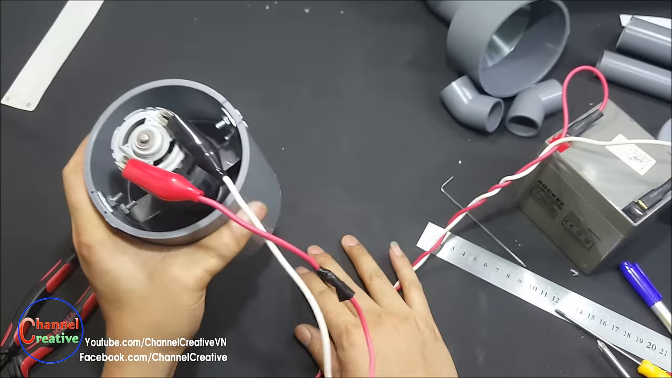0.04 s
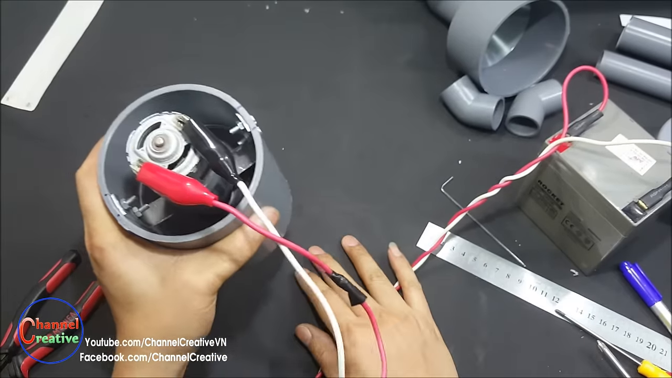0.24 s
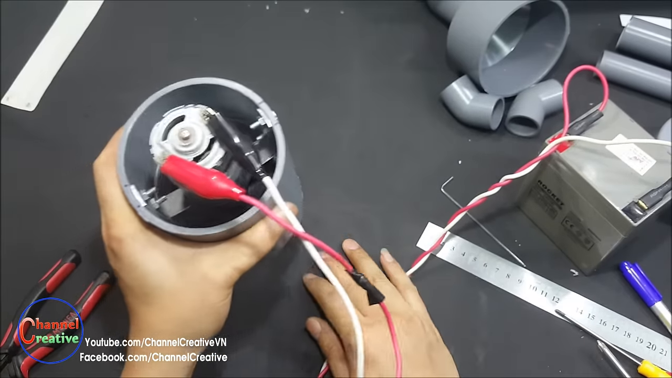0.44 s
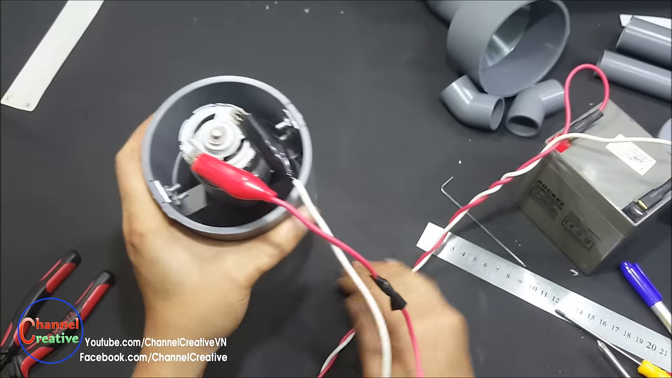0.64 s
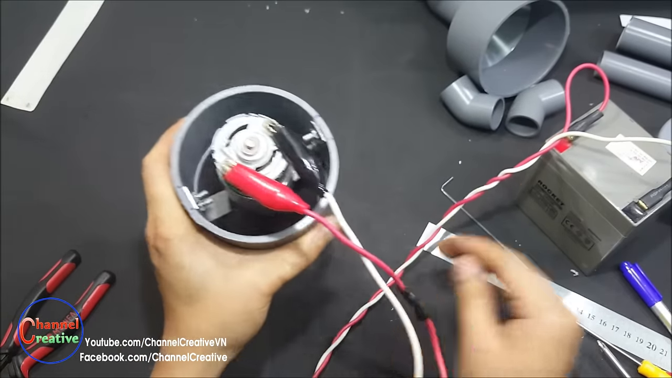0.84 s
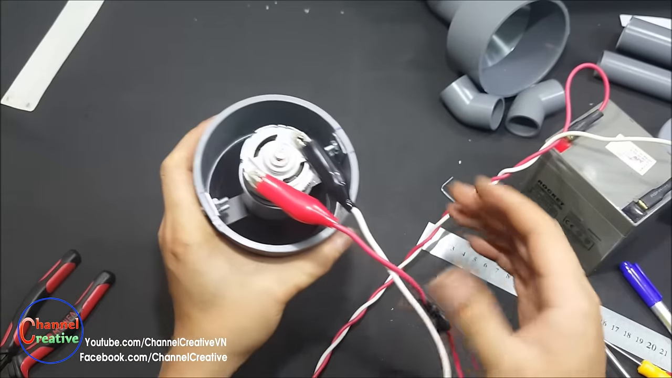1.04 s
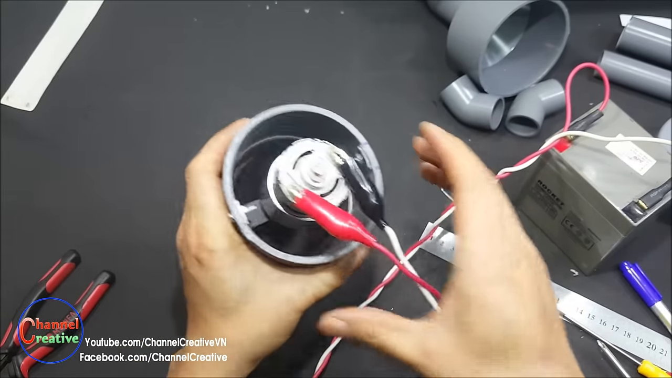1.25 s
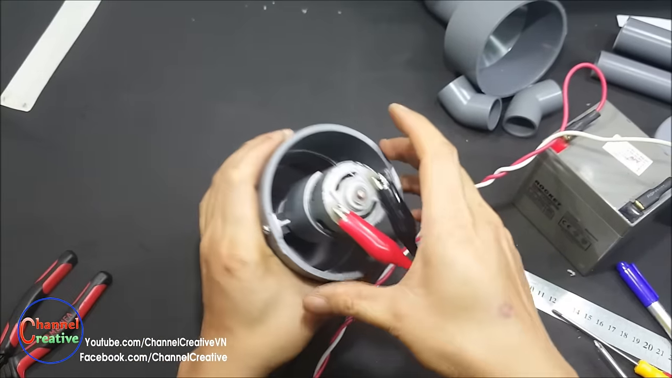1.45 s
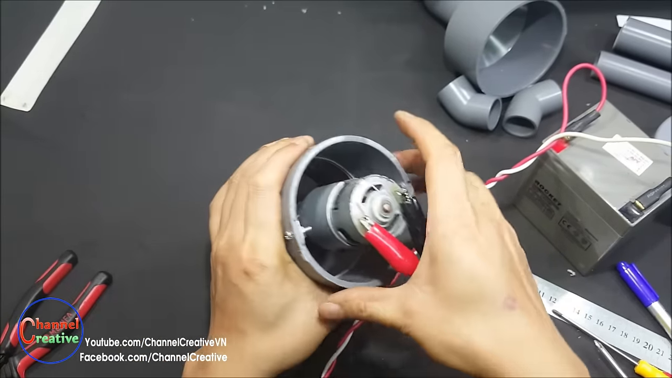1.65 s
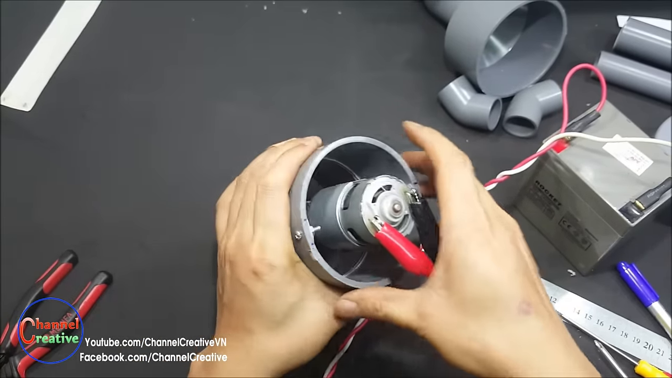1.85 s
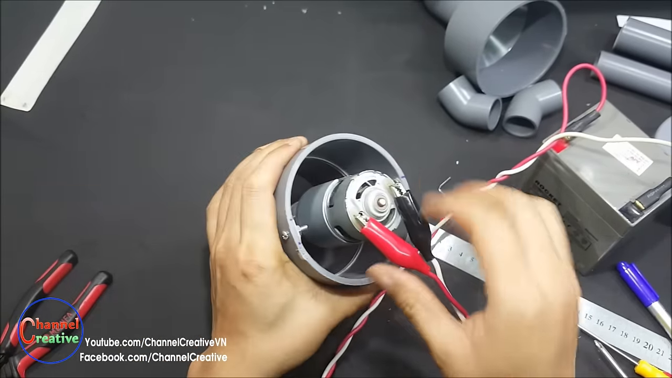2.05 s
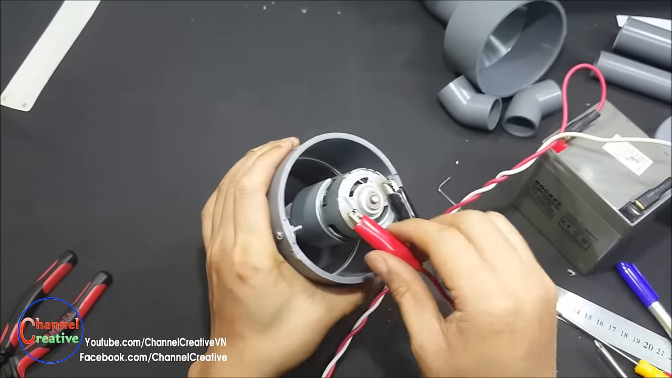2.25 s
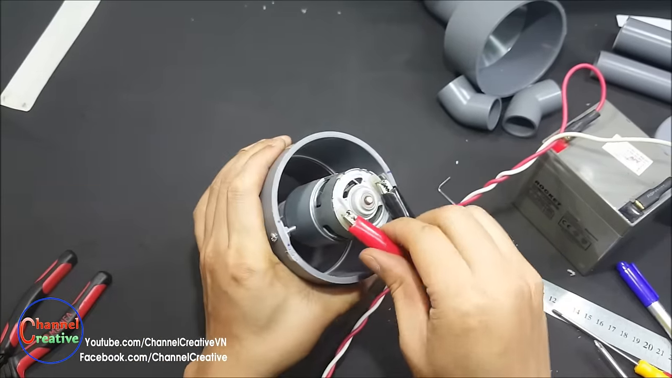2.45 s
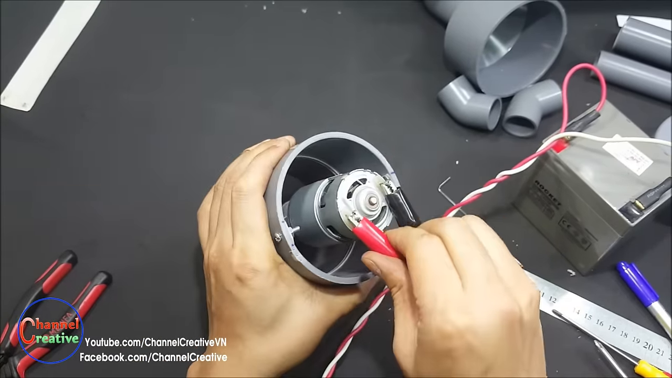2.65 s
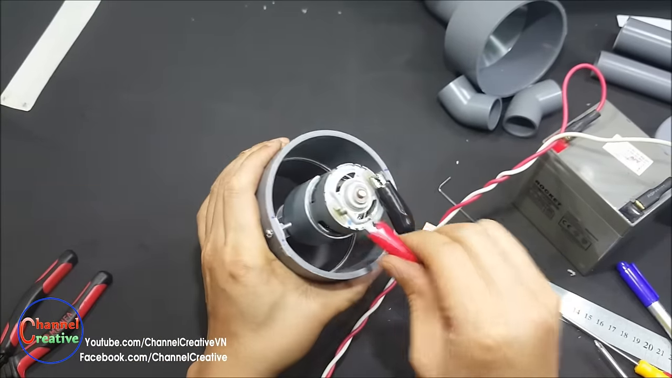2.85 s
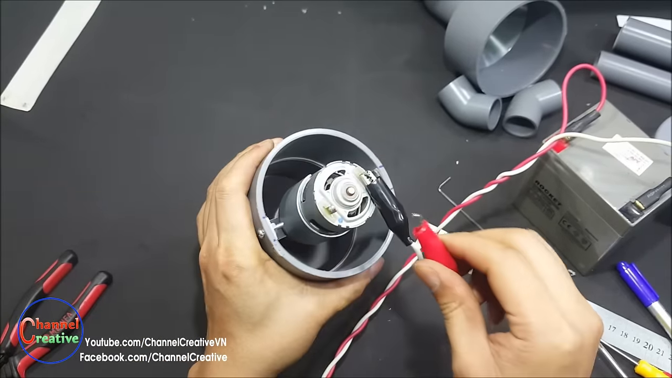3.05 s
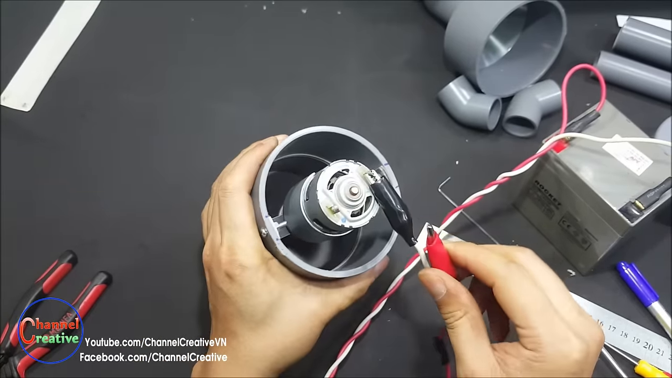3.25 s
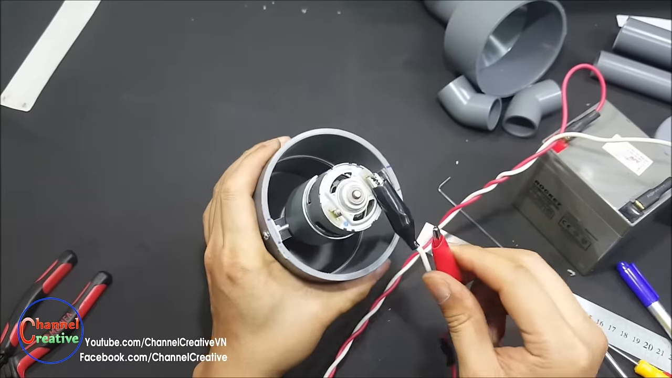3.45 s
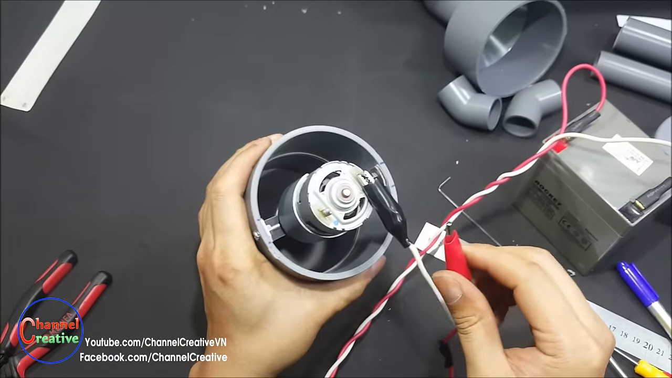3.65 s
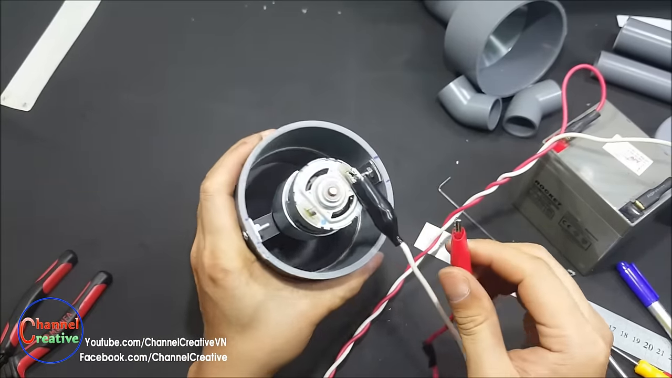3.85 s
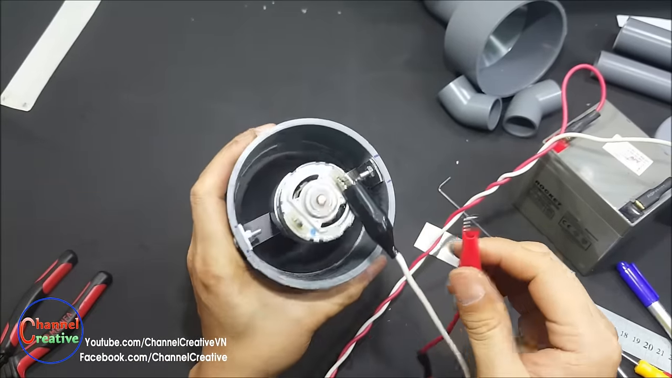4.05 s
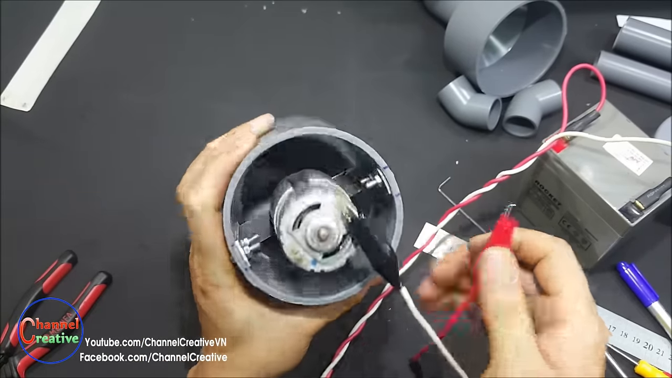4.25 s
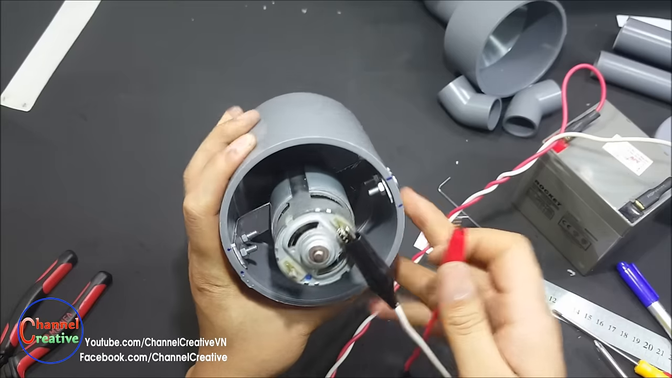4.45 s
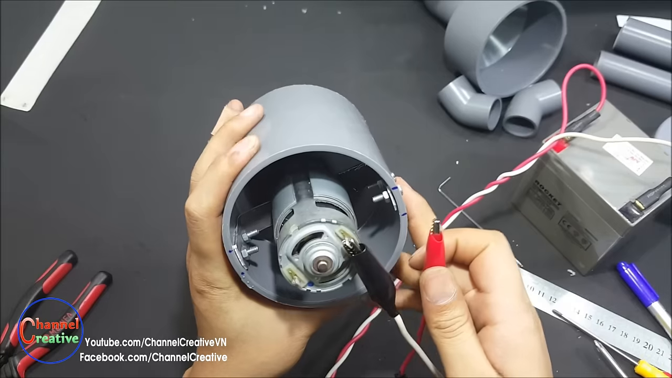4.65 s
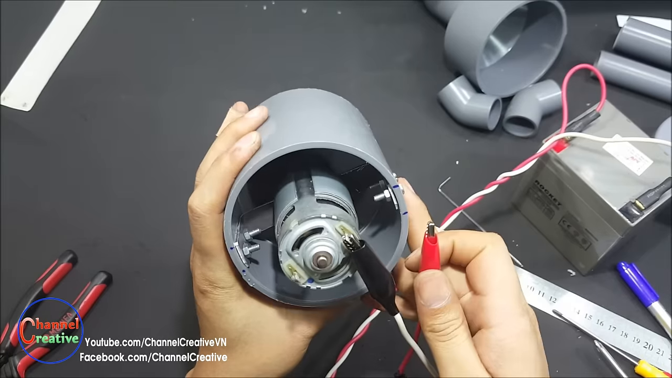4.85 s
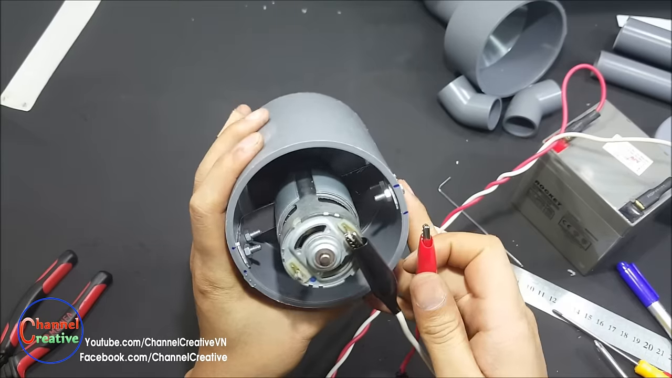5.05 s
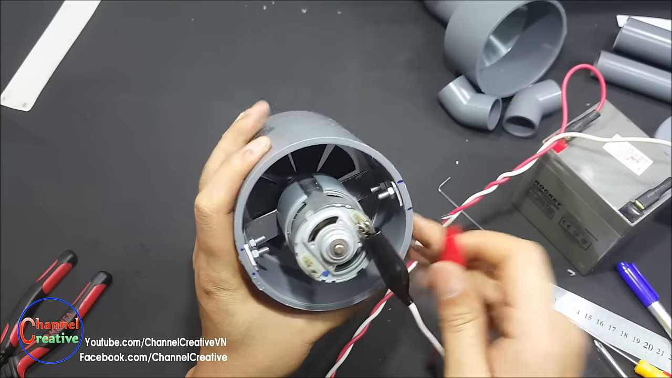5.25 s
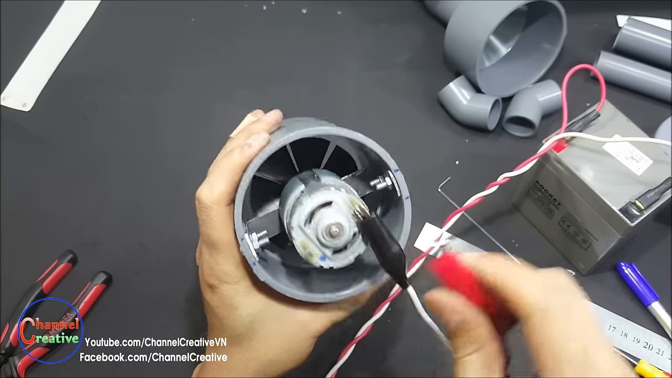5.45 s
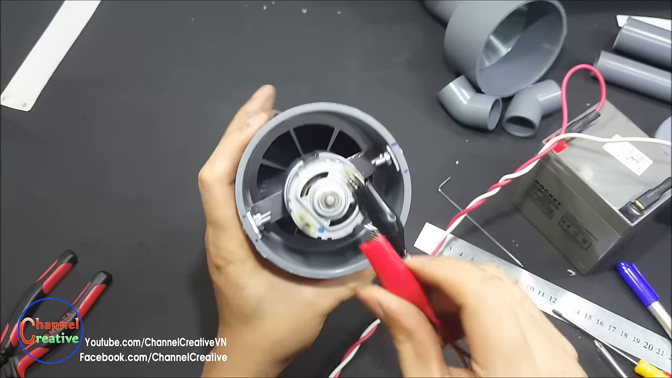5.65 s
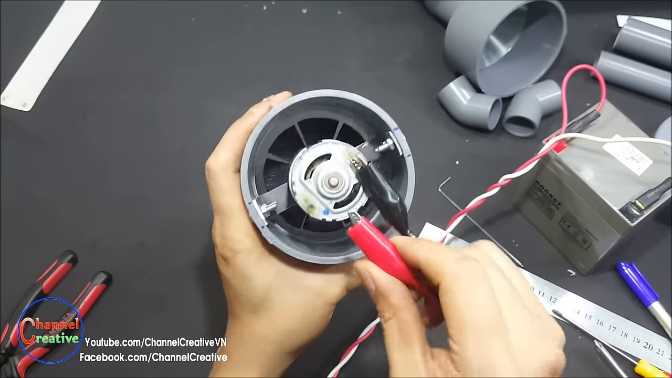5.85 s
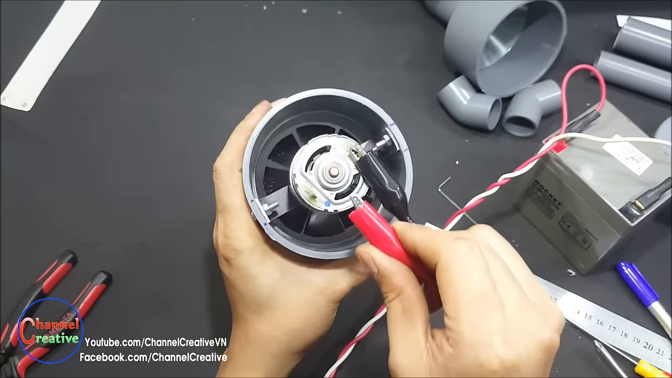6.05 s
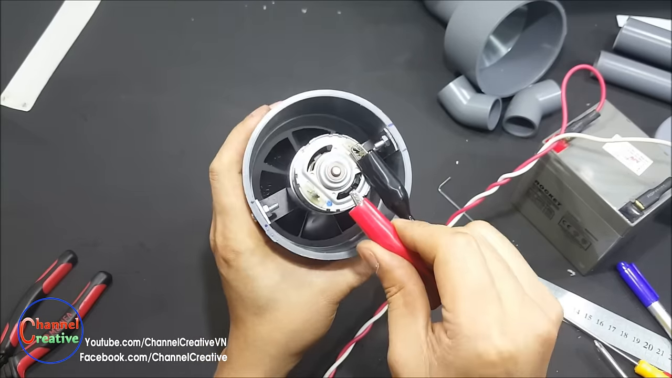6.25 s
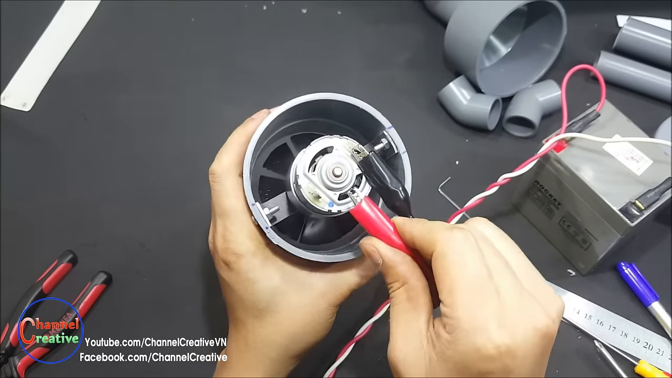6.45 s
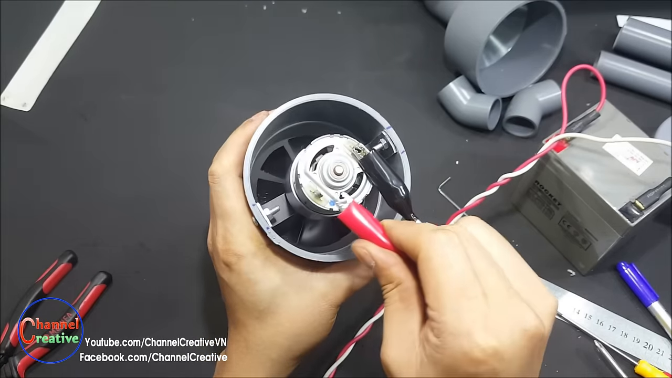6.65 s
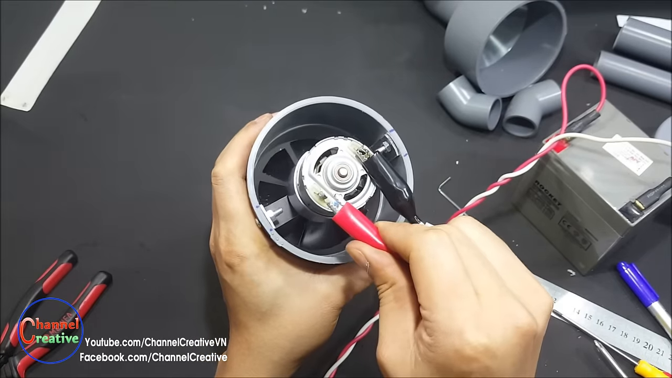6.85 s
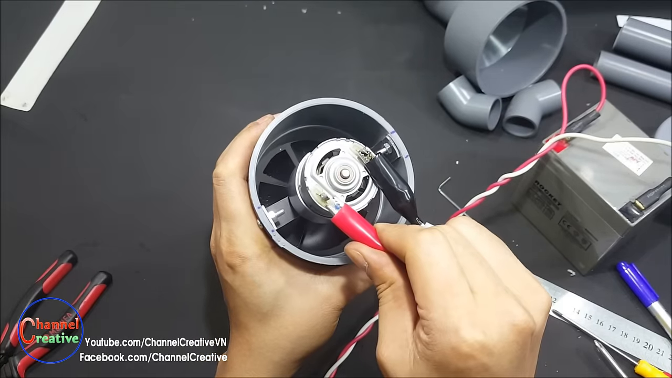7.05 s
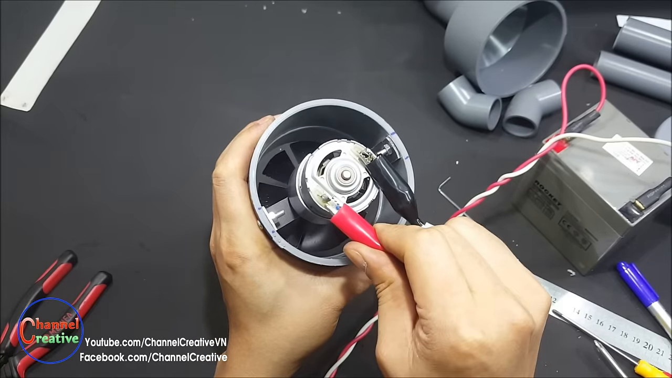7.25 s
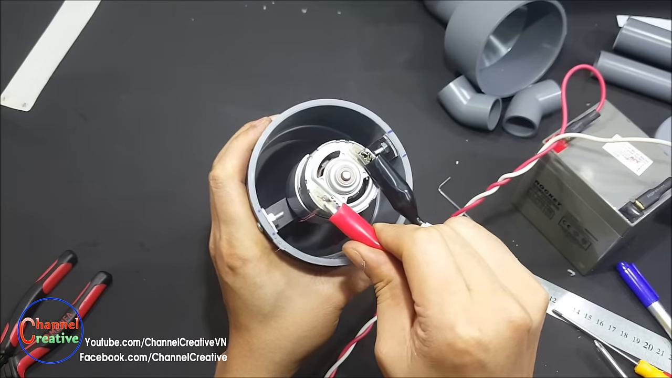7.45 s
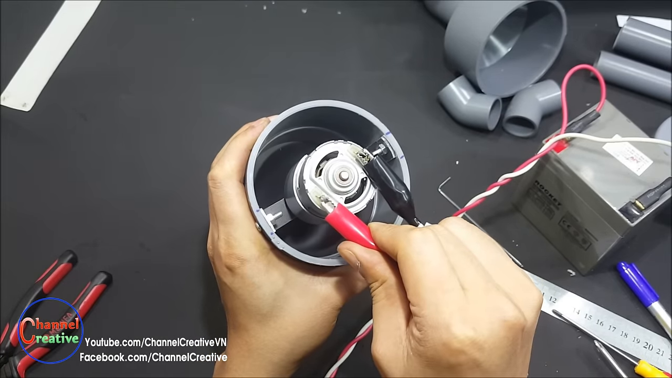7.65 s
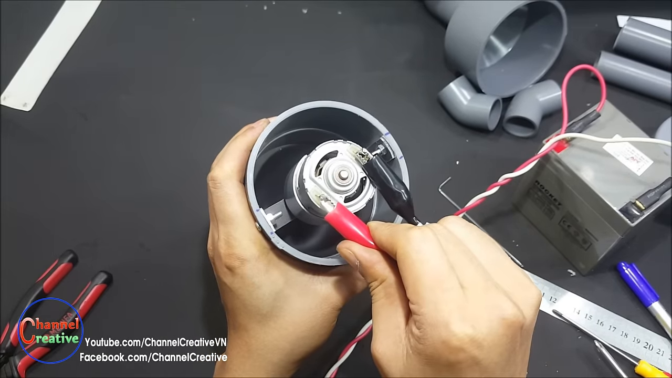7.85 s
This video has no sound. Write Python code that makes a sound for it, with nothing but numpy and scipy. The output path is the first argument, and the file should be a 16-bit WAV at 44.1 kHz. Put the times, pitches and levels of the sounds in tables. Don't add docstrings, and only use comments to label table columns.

```python
import sys
import numpy as np
from scipy import signal
from scipy.io import wavfile
from scipy.ndimage import uniform_filter1d

SR = 44100
rng = np.random.default_rng(int(sys.argv[2]) if len(sys.argv) > 2 else 0)


def pcm_store(signal):
    levels = np.round(np.clip(np.atleast_2d(signal), -1, 1) * 32767)
    wavfile.write(sys.argv[1], SR, levels.astype(np.int16).T)


def voltage_ratio(decibels):
    exponent = np.asarray(decibels, float) / 20
    return 10 ** exponent


N = 348831
T = np.arange(N) / SR

FULL_HZ, BLADES = 271.2, 7
CUT_S = 2.856
BITE_S = 7.558
STALL_HZ, STALL_DB_PER_HZ, REST_S = 54.5, 0.3, 5.33
# (time [s], shaft speed [Hz])
COAST_HZ = [(3.0, 227.3), (3.185, 186.3), (3.255, 181.2), (3.3, 167.6), (3.372, 159.8), (3.39, 149.8),
            (3.49, 141.9), (3.6, 123), (3.75, 107.6), (3.9, 93.96), (4.15, 78.8), (4.25, 72.4),
            (4.52, 60.4), (4.901, 43), (5.4, 22.03)]
# (time [s], shaft speed [Hz])
SPIN_UP_HZ = [
    (7.55, 41.98),
    (7.58, 82.27),
    (7.602, 124.9),
    (7.65, 155.7),
    (7.685, 172.8),
    (7.745, 201.9),
    (7.812, 241.3),
    (7.91, 263.2),
]
RESTART_S = SPIN_UP_HZ[0][0]
# (time [s], tilt [0-1])
TILT = [(0, 0.4), (.8, 0.12), (1.2, 0.4), (1.55, 0.93), (2.1, 1.01), (2.65, 0.89), (2.9, .95), (7.5, 0.87),
        (7.91, 0.88)]
# (time [s], level [dB])
AIM_DB = [(0, -3), (.12, -2), (.55, -4.5), (.85, -12), (.97, -11.5), (1.1, -7), (1.5, -0.5), (2.1, -1),
          (2.66, -5.5), (2.88, -4), (2.99, -1.5), (3.15, -0.5), (3.4, -0.5), (3.6, 0), (7.7, 1),
          (7.76, -4.5), (7.91, 0.5)]
# (time [s], left minus right [dB])
LEAN_DB = [(0, .2), (1.0, .6), (1.5, 1.0), (1.7, .3), (2.27, .9), (2.34, 3.6), (2.8, 3.5), (3.05, 1.3),
           (3.6, .6), (4.2, 0), (5, .5), (7.5, 1), (7.91, 1)]

# (frequency [Hz], likeness [-1 to 1])
FAN_SAME = [(100, .1), (300, .1), (650, 0.58), (1000, 0.8), (1500, .85), (2000, 0.8), (2800, 0.79),
            (4000, 0.5), (8000, 0.12), (15000, .1)]
SHOP_SAME = [(60, 0.44), (130, 0.9), (290, 0.44), (640, 0.4), (1410, -0.12), (3100, -0.078), (6820, -0.66),
             (15000, 0.4)]
# (frequency [Hz], left leads [rad])
LEAD_RAD = [(0, .3), (500, .5), (1100, .8), (1550, 2.1), (1900, 1.6), (2600, 1.2), (3600, 1.5), (6400, 1.7),
            (15000, 1.6)]
LEAD_TILTED_RAD = [(0, .3), (260, 1.5), (520, .5), (1210, .6), (1550, 1.8), (1950, 1.6), (2500, 1.0),
                   (3270, 1.1), (3790, 1.5), (5340, 1.0), (7900, 2.5), (15000, 3)]
TONE_LEAD_RAD = [(270, 1.7), (540, .6), (1350, .6), (1630, 1.7), (2200, 1.0), (15000, 1.2)]

# (facing [dB], tilted [dB], knee speed [Hz], slope below it [dB/decade], share of aim [ratio])
AIR = [
    (-23, -23.5, 186, 76, 0.26),
    (-22, -18.5, 270, 54.5, 0.28),
    (-25, -24.5, 270, 46, 0.22),
    (-41, -41.5, 227, 49, 1.3),
]
AIR_LAG_S = 0.015
PICK_UP_S = 0.03
# (frequency [Hz], density [dB/Hz])
FACING_DB = [(88, -49), (150, -20.5), (186, -10), (264, 2), (333, -4.5), (1510, -10.5), (1880, 4),
             (2150, -13.5), (3430, -21), (3850, -16.5), (6380, -23), (8880, -25.5), (9980, -29.5),
             (11900, -29), (15600, -31)]
TILTED_DB = [(88, -67.5), (150, -43), (264, -12), (320, -16), (541, -15.5), (988, -11), (1320, -4),
             (1460, -5), (1950, -6), (2110, -8.5), (2820, -12), (3780, -8), (4680, -15.5), (8540, -19),
             (15600, -26.5)]
# (frequency [Hz], width [Hz], lift [dB])
PIPE = [(617, 260, 1), (1302, 120, 1.5), (1417, 75, -6.5), (2342, 110, 6), (2590, 110, 5.5),
        (2790, 130, -3.5), (3170, 200, 2.5), (3650, 180, 1), (4400, 180, 1), (4730, 240, -3.5),
        (5520, 220, 2.5), (8720, 1200, 5), (10230, 500, -5.5)]
# (frequency [Hz], width [Hz], lift [dB])
COAST_PIPE = [(10630, 1900, 7), (13800, 2500, -0.5), (6000, 2000, 0)]
# (frequency [Hz], width [Hz], lift [dB])
SWELLS = [(830, 360, 6.5), (1265, 440, 0.5), (1610, 260, 0), (1800, 98, 6), (1990, 120, 10.5),
          (3060, 420, 5), (1150, 120, 2.5), (2550, 500, -2)]

# (facing [dB], tilted [dB], slope [dB/decade of speed])
LOWER = [(-34, -37.5, 54.5), (-47, -40.5, 62.5), (-48, -42, 59)]
# (facing [dB], tilted [dB])
UPPER_ORDERS = (5, 6, 8, 12, 15, 30, 31, 38, 39, 45, 47, 50, 52, 55)
UPPER = [(-44, -36), (-46, -28), (-47, -39), (-50, -42), (-43, -38), (-49, -48), (-51, -58), (-55, -54),
         (-54, -52), (-60, -56), (-60, -57), (-58, -52), (-62, -59), (-64, -61)]
# (time [s], level [dB])
GRIP_DB = [(0, -7), (.11, -5), (.15, 8), (.45, 10), (.65, 7), (.78, 2), (.9, -10), (1.54, -4), (1.8, 3),
           (2.6, -3), (2.85, 1)]
# (shaft speed [Hz], width [Hz], lift [dB])
MOUNT = [
    [(193, 41, 14), (154, 15, -22.5)],
    [(230, 26, 1), (140.1, 20, 2)],
    [(215, 40, 15), (125, 20, 4.5)],
]
# (start [s], hold [s], level [dB])
BLADE_TONE = [
    (7.59, 0.05, -28),
    (3.3, .14, -34),
    (3.55, .2, -41),
    (3.8, 0.2, -52),
]
TONE_RISE_DB_PER_S, TONE_FALL_DB_PER_S = 700, 150
# (start [s], hold [s], level [dB])
SHAKE_ORDERS = (2, 3, 4, 5, 6, 8)
SHAKES = [
    [(3.2, 0.15, -30.5), (7.68, 0.053, -33)],
    [(2.97, 0.19, -35), (3.195, 0.054, -24), (3.385, .1, -30.5), (7.68, 0.053, -22)],
    [(3.417, 0.074, -32)],
    [(3.29, 0.046, -30), (3.76, 0.19, -46)],
    [(3.86, .16, -45)],
    [(4.08, 0.17, -50)],
]
CATCH_DB_PER_S, LET_GO_DB_PER_S, SHAKE_ROUGH_DB = 580, 600, 2.5

# (start [s], hold [s], level [dB])
DRAUGHT = [(0, 0.11, -34.5), (.19, 0.017, -39.5), (.32, 0.25, -39.5), (.55, 0.1, -38), (.65, 0.21, -36),
           (.9, .08, -32.5), (1.0, 0.18, -34.5), (1.23, 0.086, -30.5), (1.4, 0.096, -34), (1.5, 0.24, -43),
           (1.66, 0.13, -46.5), (1.82, 0.023, -36), (1.92, 0.018, -36.5), (1.97, 0.077, -40.5),
           (2.2, .01, -61.5), (2.28, 0.0079, -56), (2.41, 0.0068, -48), (2.58, 0.02, -48.5),
           (2.76, 0.0084, -49), (2.96, 0.07, -46), (3.12, 0.092, -42), (3.43, 0.11, -45), (3.63, 0.13, -51),
           (3.8, 0.019, -43), (7.6, .09, -45), (7.857, 0.012, -23.5), (7.8, .03, -36.5)]
PUFF_RISE_DB_PER_S, PUFF_FALL_DB_PER_S = 930, 200
# (frequency [Hz], density [dB/Hz])
GUST_DB = [(20, -24.5), (50, -12), (110, -4), (200, -4), (400, -8), (800, -19), (1500, -47.5)]

# (frequency [Hz], density [dB/Hz])
SHOP_SPECTRUM_DB = [(15, -42), (25, -14), (75, -6.5), (156, -7), (434, -20), (584, -19.5), (668, -26.5),
                    (785, -22.5), (898, -24), (8170, -45), (10400, -55.5), (14400, -56.5), (15600, -58.5)]
SHOP_DB, DUCK_DB = -48.5, -40.5
# (frequency [Hz], width [Hz], level [dB])
HUMS = [(77.6, 8.5, -54.5), (98.6, 9.7, -49.5), (139, 6, -54), (185, 9.7, -55), (242, 3.2, -69.5),
        (314, 1.3, -66), (778, 1.5, -66.5)]
# (start [s], hold [s], level [dB])
HUM_SWELL = [(3.5, 0.43, -45.5), (4.26, 0.0092, -44.5), (4.45, 0.28, -52.5), (5.11, 0.013, -44.5),
             (5.33, 0.4, -47.5), (5.88, .01, -44.5), (6.09, 0.38, -47), (6.56, .3, -44.5),
             (7.01, .01, -40.5), (7.37, .04, -44)]
SURGE_RISE_DB_PER_S, SURGE_FALL_DB_PER_S = 89, 80

# (start [s], hold [s], level [dB], frequency [Hz], width [Hz])
SINGING = [(2.97, 0.092, -23.5, 1340, 90), (3.09, .11, -19.5, 1295, 34), (3.22, 0.052, -25, 1250, 70),
           (3.265, 0.054, -23.5, 2070, 45), (3.32, 0.044, -22, 1620, 45), (3.35, .05, -28, 2160, 70),
           (3.44, 0.049, -24, 1990, 60.3), (1.42, .35, -32, 2200, 30), (.1, .7, -33, 3820, 120),
           (1.2, .4, -30.5, 1810, 30), (0.05, 0.4, -27, 1800, 35), (.2, .3, -30, 2100, 35.03),
           (1.9, 0.22, -33.5, 1800, 30), (2.25, 0.44, -19.5, 1935, 35), (2.72, .2, -20.5, 1930, 45),
           (2.86, .07, -25, 1800, 60), (0.83, .1, -27, 2200, 220), (1.6, .12, -29, 1800, 30),
           (2.2, .12, -33.5, 1300, 70), (7.612, .012, -34, 1890, 90), (7.66, .015, -27, 1940, 80),
           (7.58, 0.056, -35.5, 2700, 2700), (7.66, 0.047, -23, 1150, 70), (7.77, .05, -28, 3000, 120),
           (3.93, 0.074, -37, 625, 50), (4.4, 0.22, -52.5, 550, 90), (4.48, .12, -56, 757, 250),
           (3.55, 0.19, -35.5, 860, 150), (4.8, 0.091, -53, 620, 30), (4.95, .15, -58.5, 400, 30),
           (3.519, 0.23, -40, 2670, 240), (4.28, 0.597, -65, 3200, 200), (3.9, 0.38, -55, 3300, 300),
           (3.84, 0.1, -41.5, 1300, 110), (3.96, .13, -49, 1150, 90), (3.65, .08, -38, 1550, 60),
           (3.79, .11, -45, 2200, 70), (4.75, 0.26, -66, 2150, 100), (7.675, 0.025, -20, 2080, 59.8),
           (7.68, .02, -23, 2450, 150), (7.715, .04, -29, 1346, 250), (7.558, .02, -40, 720, 700),
           (7.82, .08, -28.5, 3300, 400), (7.81, .1, -18.5, 1796, 89.4)]

# (frequency [Hz], width [Hz], level [dB])
HOUSING = [(395, 82, -7), (600, 160, -1), (850, 210, -3), (1256, 89, -4.5), (1560, 110, -3.5),
           (2080, 70, -3), (3300, 300, -12)]
BRUSH_DB, BRUSH_DB_PER_DECADE, SETTLE_HZ, LOADED_DB = -27, 28.5, 35.1, -1.5
CHATTER_HZ, CHATTER_DB = 144, 5.5

# (start [s], hold [s],
# level [dB])
RATTLE = [
    (3.248, 0.12, -23.5),
    (7.585, .03, -49),
    (7.672, .1, -27.5),
]
RATTLE_RISE_DB_PER_S, RATTLE_FALL_DB_PER_S = 280, 115
# (frequency [Hz], density [dB/Hz])
KNOCK_DB = [(300, -30), (1000, -9.5), (1600, -4.5), (1850, -7), (2100, 2), (2350, -8), (3000, -9),
            (6000, -8.5), (10000, -11), (15000, -10)]

# (time [s], peak [dB])
TICKS = [
    (3.809, -30),
    (4.5632, -37),
    (4.59, -42),
    (5.3471, -59),
    (5.6703, -56.5),
    (5.9781, -55.5),
]
TOUCH_TOP_HZ = 5000

SNAP_S, SNAP_DB, SNAP_T60_S = 7.5433, -20, 0.005
FIZZ_DB, FIZZ_T60_S, FIZZ_S = -32, 0.06, 0.011
KICK_S, KICK_T60_S = 7.5445, 0.006
# (frequency [Hz], level [dB])
KICK = [(850, -27), (1400, -28), (1850, -23), (2350, -27), (2950, -27), (4300, -31)]
FLARE_S, FLARE_DB, FLARE_T60_S, FLARE_LOW_HZ = 7.607, -24, 0.06, 8500


def evened(x):
    return x / np.sqrt(np.mean(x ** 2) + 1e-20)


def at(points, t):
    return np.interp(t, *np.transpose(points))


def read(points, hz):
    f, value = np.transpose(points)
    return np.interp(np.log(hz + 1), np.log(f + 1), value)


def filtered(x, order, hz, kind="highpass"):
    return signal.sosfilt(signal.butter(order, hz, kind, fs=SR, output="sos"), x)


def drift(rate_hz):
    rates = np.geomspace(rate_hz / 8, rate_hz, 16)
    return evened(sum(np.sin(2 * np.pi * (f * T + rng.random())) / np.sqrt(f) for f in rates))


def grid(size):
    return np.arange(N * 4 // size + 4) * size / 4 / SR, np.fft.rfftfreq(size, 1 / SR)[:, None]


def hiss(gain, same, lead_rad, patchy_db, size):
    a, b, c, d, patch = rng.standard_normal((gain.shape[1], gain.shape[0], 5)).T
    patch = evened(uniform_filter1d(uniform_filter1d(patch, 5, 0), 9, 1))
    same = np.clip(same, -1, 1)
    left = a + 1j * b
    right = same * left + np.sqrt(1 - same ** 2) * (c + 1j * d)
    z = np.array([left, right * np.exp(-1j * lead_rad)])
    z *= gain * voltage_ratio(patchy_db * patch) * np.sqrt(SR / size)
    return signal.istft(z, nperseg=size, noverlap=size * 3 // 4)[1][:, :N]


def unit(gain, hz, lo_hz=0, hi_hz=20000):
    inside = (hz > lo_hz) & (hz < hi_hz)
    return gain / np.sqrt(((gain * inside) ** 2).sum(0) * hz[1] + 1e-30)


def lifts(modes, hz):
    return sum(db / (1 + (2 * (hz - f) / w) ** 2) for f, w, db in modes)


def bumps(rows, t, rise, fall):
    levels = []
    for s, hold, db in rows:
        level = db - rise * np.maximum(s - t, 0) - fall * np.maximum(t - s - hold, 0)
        levels.append(np.maximum(level, -120))
    return np.max(levels, 0)


def speed(t):
    return np.where(t < RESTART_S, at([(CUT_S, FULL_HZ)] + COAST_HZ, t), at(SPIN_UP_HZ, t))


def slowing(t, knee_hz, db_per_decade):
    hz = speed(t)
    rest = (t > REST_S) & (t < RESTART_S)
    stall_db = STALL_DB_PER_HZ * np.maximum(STALL_HZ - hz, 0)
    return db_per_decade * np.log10(np.minimum(hz / knee_hz, 1)) - stall_db - 100 * rest


def lead(t, hz):
    tilt = np.clip(at(TILT, t), 0, 1) ** 2
    return (1 - tilt) * read(LEAD_RAD, hz) + tilt * read(LEAD_TILTED_RAD, hz)


def whine():
    hz, tilt, out = speed(T), at(TILT, T), np.zeros((2, N))
    turns = np.cumsum(hz * (1 + 0.00065 * drift(6))) / SR
    levels = []
    for k, (facing, tilted, slope) in enumerate(LOWER, 1):
        db = facing + (tilted - facing) * tilt + slowing(T, FULL_HZ, slope) + lifts(MOUNT[k - 1], hz)
        levels.append((k, db + at(GRIP_DB, T) * (k == 1) + 1.2 * drift(25)))
    blade_db = bumps(BLADE_TONE, T, TONE_RISE_DB_PER_S, TONE_FALL_DB_PER_S)
    levels.append((BLADES, blade_db + slowing(T, 64, 30)))
    for k, rows in zip(SHAKE_ORDERS, SHAKES):
        levels.append((k, bumps(rows, T, CATCH_DB_PER_S, LET_GO_DB_PER_S) + SHAKE_ROUGH_DB * drift(60)))
    fade_db = 110 * np.log10(hz / FULL_HZ) - 100 * ((T > REST_S) & (T < RESTART_S))
    for k, (facing, tilted) in zip(UPPER_ORDERS, UPPER):
        levels.append((k, facing + (tilted - facing) * tilt + fade_db))
    for k, db in levels:
        left = 2 * np.pi * (k * turns + rng.random())
        right = left - read(TONE_LEAD_RAD, k * FULL_HZ) - 0.45 * drift(2.5)
        out += np.sqrt(2) * voltage_ratio(db + 1.3 * drift(14)) * np.cos([left, right])
    return out


def air_db(t, layer):
    facing_db, tilted_db, knee_hz, slope, share = AIR[layer]
    late = t - AIR_LAG_S * (layer < 3)
    level_db = facing_db + (tilted_db - facing_db) * at(TILT, t)
    return level_db + share * at(AIM_DB, t) + slowing(late, knee_hz, slope)


def rush():
    t, hz = grid(size=1024)
    shaft, tilt = speed(t), np.clip(at(TILT, t), 0, 1)
    shape_db = (1 - tilt) * read(FACING_DB, hz) + tilt * read(TILTED_DB, hz)
    slow = np.clip((150 - shaft) / 30, 0, 1) * (t < REST_S)
    shape = voltage_ratio(shape_db + lifts(PIPE, hz) + lifts(COAST_PIPE, hz) * slow)

    bands_hz = [(350, 1500), (2300, 5000), (6000, 15000)]
    place = np.interp(np.log(hz + 1), np.log([1300, 2800, 7000]), [0, 1, 2])
    lift_db = 0
    for k, band in enumerate(bands_hz):
        scale = unit(shape, hz, *band)[9] / shape[9]
        trim_db = air_db(t, k) + 20 * np.log10(scale)
        lift_db = lift_db + np.maximum(1 - abs(place - k), 0) * trim_db

    blade_hz = BLADES * shaft * (1 + (0.035 * tilt - 0.03) * (shaft / FULL_HZ) ** 6)
    width_hz = 0.04 * blade_hz + 15 + 0.6 * (FULL_HZ - shaft)
    fuzz = unit(1 / (1 + ((hz - blade_hz) / width_hz) ** 4), hz)
    second = unit(1 / (1 + ((hz - 1.99 * blade_hz) / (0.099 * blade_hz + 15)) ** 2), hz)
    second_db = -4.0 - 2.4 * ((t > CUT_S) & (t < REST_S)) + 1.5 * (t > REST_S)
    fuzz = fuzz + voltage_ratio(second_db) * second
    fuzz_db = air_db(t, len(bands_hz)) + 24.5 - np.maximum(100 - shaft, 0) * 0.31
    gain = np.hypot(shape * voltage_ratio(lift_db), fuzz * voltage_ratio(fuzz_db + lifts(SWELLS, hz) - 5.5))
    moving = np.where(T < REST_S, 1, np.clip((T - BITE_S) / PICK_UP_S + 0.2, 0, 1))
    return hiss(gain, read(FAN_SAME, hz), lead(t, hz), patchy_db=1.5, size=1024) * moving


def draught():
    t, hz = grid(size=1024)
    puffs_db = bumps(DRAUGHT, t, PUFF_RISE_DB_PER_S, PUFF_FALL_DB_PER_S)
    gain = unit(voltage_ratio(read(GUST_DB, hz)), hz, 40, 230) * voltage_ratio(puffs_db)
    lumps = voltage_ratio(2.0 * np.array([drift(75), drift(75)]) + 5.5)
    return lumps * hiss(gain, 0, 0, patchy_db=4.5, size=1024)


def workshop():
    t, hz = grid(size=1024)
    gain = unit(voltage_ratio(read(SHOP_SPECTRUM_DB, hz)), hz) * voltage_ratio(SHOP_DB + 0 * t)
    room = hiss(gain, read(SHOP_SAME, hz), 0, patchy_db=0.95, size=1024)
    swell = voltage_ratio(bumps(HUM_SWELL, T, SURGE_RISE_DB_PER_S, SURGE_FALL_DB_PER_S) + 46.0)
    for f, w, db in HUMS:
        cycles = np.cumsum(f + w / 4 * drift(5)) / SR
        level = voltage_ratio(db + min(w / 3, 1.8) * drift(w + 2)) * np.sqrt(2)
        room += level * np.cos(2 * np.pi * cycles) * (swell if f < 200 else 1)
    return room * voltage_ratio(DUCK_DB * np.clip((speed(T) - 115) / 65, 0, 1))


def singing():
    t, hz = grid(size=1024)
    rest_db = -100 * ((t > REST_S) & (t < BITE_S))
    power = 0
    for s, hold, db, f, w in SINGING:
        level_db = bumps([(s, hold, db)], t, 96 / hold ** 0.5, 102 / hold ** 0.5) + rest_db
        power = power + (unit(1 / (1 + (2 * (hz - f) / w) ** 2), hz) * voltage_ratio(level_db)) ** 2
    return hiss(np.sqrt(power), read(FAN_SAME, hz), lead(t, hz), patchy_db=2.5, size=1024)


def rattle_db(t):
    rest = (t > REST_S) & (t < BITE_S)
    return bumps(RATTLE, t, RATTLE_RISE_DB_PER_S, RATTLE_FALL_DB_PER_S) - 100 * rest


def brush_db(t):
    shaft, loaded = speed(t), t > RESTART_S
    settled = np.maximum(1 - (FULL_HZ - shaft) / SETTLE_HZ, 0) * (t < RESTART_S)
    chatter_db = CHATTER_DB * np.clip((shaft - CHATTER_HZ) / 6 + 1, 0, 1)
    level_db = BRUSH_DB + slowing(t, FULL_HZ, BRUSH_DB_PER_DECADE) + LOADED_DB * loaded
    return level_db + chatter_db - 15 * settled - 100 * (t < CUT_S)


def housing(hz):
    return np.sqrt(sum((voltage_ratio(db) / (1 + (2 * (hz - f) / w) ** 2)) ** 2 for f, w, db in HOUSING) + 1e-4)


def brushes():
    t, hz = grid(size=1024)
    gain = unit(housing(hz), hz, 480, 900) * voltage_ratio(brush_db(t) - 15.5)
    out = hiss(gain, read(FAN_SAME, hz), read(LEAD_RAD, hz), patchy_db=6.0, size=1024)
    shaft = speed(T)
    turns = np.cumsum(shaft) / SR
    level = voltage_ratio(brush_db(T) - 6.0 - np.maximum(95 - shaft, 0) * 0.11)
    for k in range(4, 17):
        blur = np.cumsum(drift(30)) / SR * k ** 2 / 18 * (1 + 60 / shaft)
        left = 2 * np.pi * (k * turns + blur + rng.random())
        right = left - read(LEAD_RAD, k * shaft)
        knock = voltage_ratio(rattle_db(T) - 8.5) * (k in (10, 12, 16))
        order = level * housing(k * shaft) * voltage_ratio(-0.6 * max(k - 8, 0)) + knock
        out += order * voltage_ratio(4.7 * drift(20)) * np.cos([left, right])
    return out


def rattle():
    t, hz = grid(size=256)
    gain = unit(voltage_ratio(read(KNOCK_DB, hz)), hz, 7000, 13000) * voltage_ratio(rattle_db(t))
    turn = np.cumsum(speed(T)) / SR % 1
    strike = 1.1 + np.exp(-turn / 0.32)
    return evened(strike) * hiss(gain, 4.5 * read(FAN_SAME, hz), read(LEAD_RAD, hz), patchy_db=1.5, size=256)


def contacts():
    out, t = np.zeros((2, N)), np.arange(2500) / SR
    ring = sum(voltage_ratio(-60 * t / 0.0063) * np.sin(2 * np.pi * f * t) for f in (905, 1810, 2400, 3050, 4230))
    for s, db in TICKS:
        shared, own = rng.standard_normal(len(t)), rng.standard_normal((2, len(t)))
        burst = (0.61 * shared + 1.1 * own) * voltage_ratio(-60 * t / 0.05) * np.minimum(t / 0.0022, 1) ** 2
        burst = 0.26 * burst + 0.039 * signal.fftconvolve(burst, ring[None])[:, :len(t)]
        burst = filtered(burst, 2, (600, TOUCH_TOP_HZ), "bandpass")
        out[:, round((s - 0.002) * SR):][:, :len(t)] += voltage_ratio(db) * 2.1 * burst
    return out


def spark():
    shared, own = rng.standard_normal(N), rng.standard_normal((2, N))
    age, ring = np.clip(T - SNAP_S, 0, 1), np.clip(T - KICK_S, 0, 1)
    fizz = voltage_ratio(FIZZ_DB - 60 * age / FIZZ_T60_S) * (age < FIZZ_S)
    level = (voltage_ratio(SNAP_DB - 60 * age / SNAP_T60_S) + fizz) * (T > SNAP_S)
    snap = filtered((0.55 * shared + 0.64 * own) * level, 1, 900)
    kick = sum(voltage_ratio(db - 60 * ring / KICK_T60_S) * np.sin(2 * np.pi * f * ring) for f, db in KICK)
    return snap + kick


def treble_flare():
    decay = voltage_ratio(FLARE_DB - 60 * np.clip(T - FLARE_S, 0, 1) / FLARE_T60_S)
    onset = np.clip((T - FLARE_S) / 0.012, 0, 1)
    return filtered(rng.standard_normal((2, N)) * decay * onset, 6, FLARE_LOW_HZ)


def scene():
    lean_db = at(LEAN_DB, T)
    noise = filtered(rush() + rattle() + brushes() + singing(), 8, 185)
    fan = (whine() + noise) * voltage_ratio(np.array([lean_db, -lean_db]) / 2 + 1.7)
    ambience = (draught() + workshop()) * voltage_ratio(np.array([[0.9], [-0.9]]))
    return fan + ambience + contacts() + spark() + treble_flare()


def roll_off(x):
    return signal.sosfilt(signal.butter(12, 16010, fs=SR, output="sos"), x)


def record(dry):
    mix = dry + voltage_ratio(-74.0) * rng.standard_normal(dry.shape)
    mix = filtered(mix, 2, 45)
    edge = signal.firwin(767, 15300, window=("kaiser", 9), fs=SR)
    mix = signal.oaconvolve(np.clip(mix, -1, 1), edge[None], "same")
    return roll_off(mix)


dry = scene()
out = record(dry)
pcm_store(out)
```